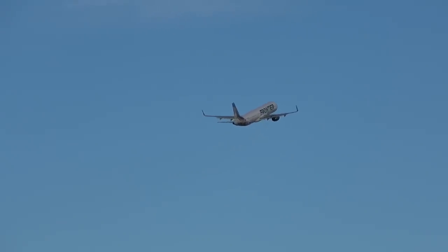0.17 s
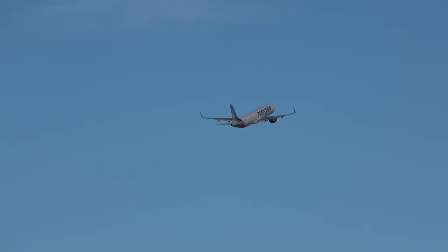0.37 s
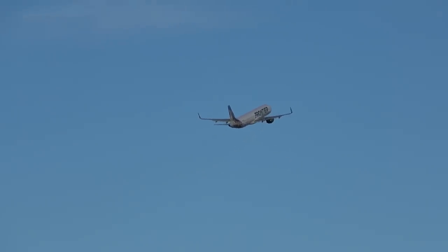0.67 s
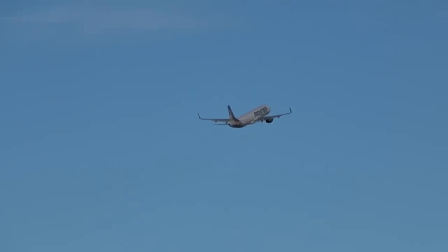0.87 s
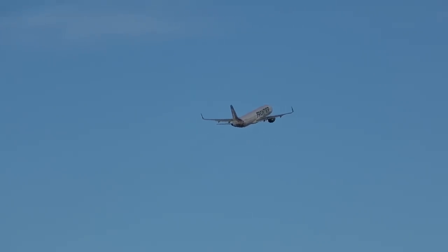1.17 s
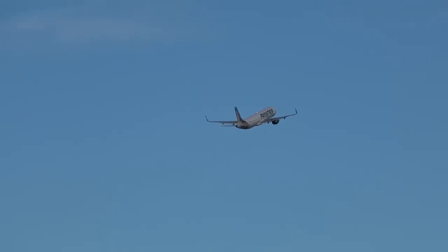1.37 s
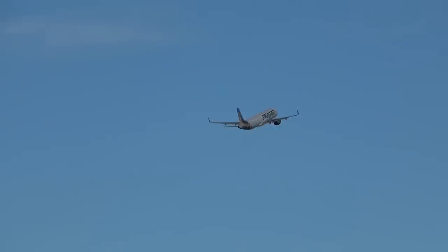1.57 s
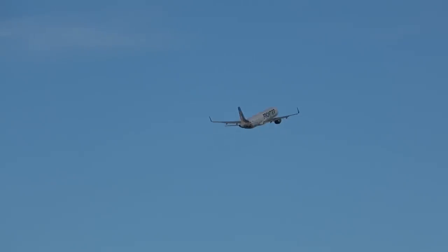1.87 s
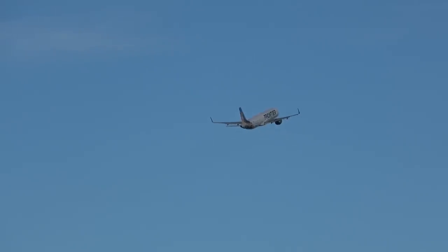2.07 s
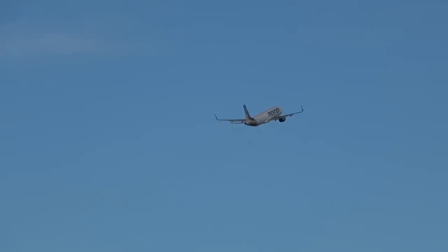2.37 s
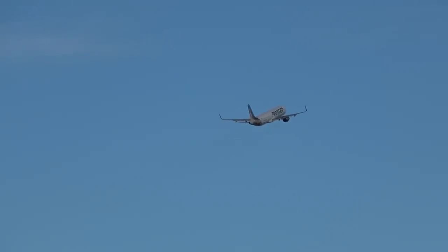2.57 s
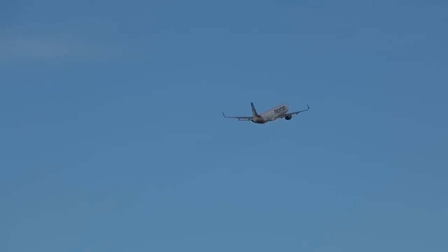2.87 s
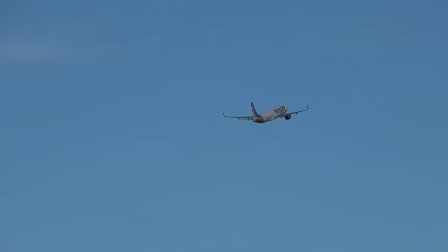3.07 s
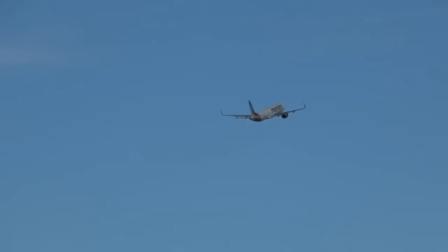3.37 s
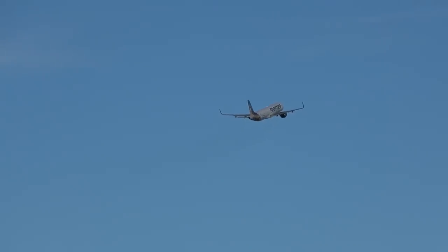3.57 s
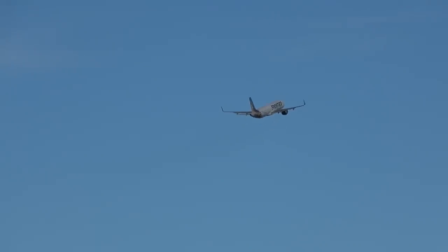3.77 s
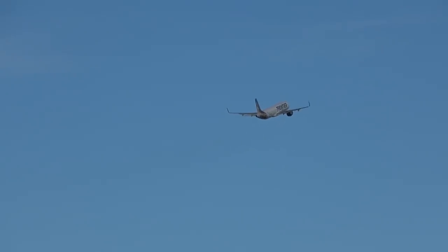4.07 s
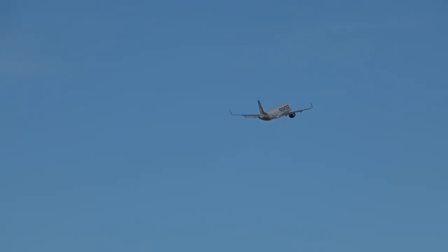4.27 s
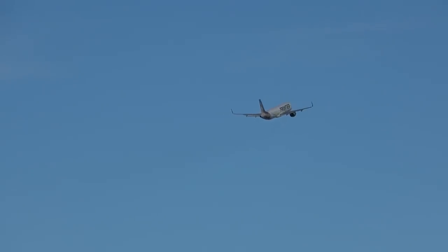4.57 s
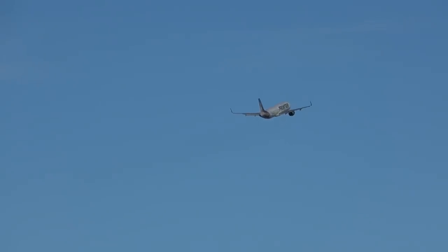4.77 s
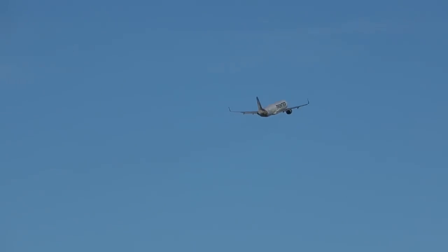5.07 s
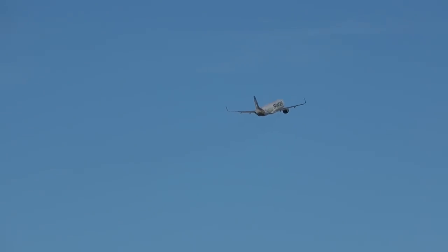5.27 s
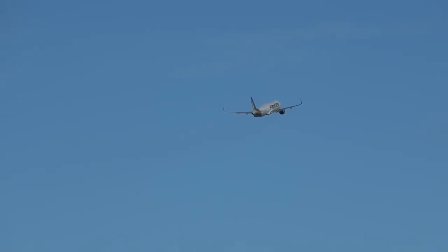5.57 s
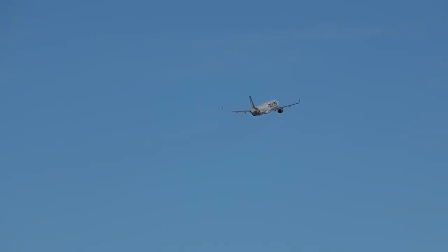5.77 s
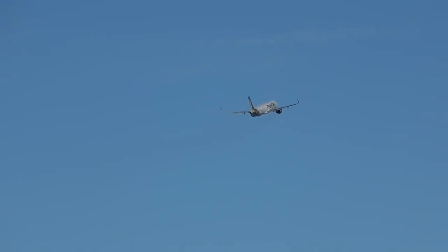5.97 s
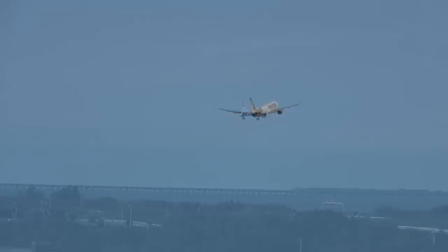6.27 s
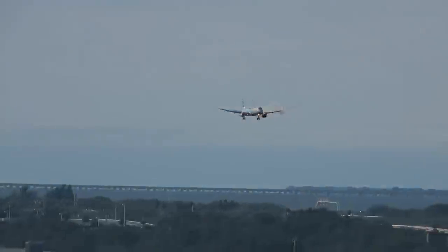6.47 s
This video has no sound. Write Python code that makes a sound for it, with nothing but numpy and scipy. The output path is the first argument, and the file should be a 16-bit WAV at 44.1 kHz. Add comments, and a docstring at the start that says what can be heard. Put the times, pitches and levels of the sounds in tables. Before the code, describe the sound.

Outdoors, one distant microphone hears a jet airliner climbing away: a broad, bass-heavy exhaust rumble and roar, brightest around one and a half seconds, then duller and farther off, with gusty surges. Faint wavering machine tones, a blurred whine and thin hiss lie underneath. Near the end the sound cuts dead with a tiny tick and low bump into a softer, flatter rush of another jet approaching.

```python
"""Airliner climbing away, then one on approach

Far below the climbing jet, exhaust rumble and roar swell and fade: noise bands weighted by eddy size.
Steady turbine tones, likely from machinery on the ground, hum underneath as wavering sines.
A blurred whine and a faint hiss, both filtered noise, join them.
Near the end the sound cuts, with a thin tick and a low bump, to the softer noise rush of an approach."""
import sys
import numpy as np
from scipy import signal
from scipy.io import wavfile

SR = 44100
rng = np.random.default_rng(int(sys.argv[2]) if len(sys.argv) > 2 else 0)


def unload_audio(sound):
    """Save the sound as a 16-bit wav file, at the path given as the first command line argument."""
    columns = np.transpose(np.atleast_2d(sound))
    # keep every value between -1 and 1, then stretch to whole-number steps
    steps = np.round(np.clip(columns, -1, 1) * 32767)
    wavfile.write(sys.argv[1], SR, steps.astype(np.int16))


N = 292381
T = np.arange(N) / SR  # seconds
CUT_S = 6.178
HUM_HZ = 383.7
CUTOFF_HZ = 15800
GUST_DB = 0.36  # spread of the random gusts, separate for each eddy size
BEAM_RISE_S, BEAM_FALL_S = 1.42, 0.5  # a beam arrives slowly and leaves quickly

# ranges of sub-bass, rumble, roar, rush and hiss: low_hz, high_hz
ZONES = [(20, 55), (60, 170), (190, 600), (850, 1450), (2000, 4500)]
# eddy sizes in the exhaust, in the order of ZONES, each with a loud beam that sweeps over the
# listener; a negative fade grows: level_db, fade_db_per_s, beam_s, beam_db
EDDIES = [(-31, -0.06, 1.5, 4.5), (-19.5, 0.23, 1.4, 0.6), (-20.5, 0.05, 1.66, 3.5), (-31.5, 0.79, 1.1, 3),
          (-46, 0.9, 1.26, 5)]
# shape of the exhaust spectrum while near, before the zone levels: pitch_hz, relative_db_per_hz
NEAR_COLOUR = [(18.0, -20), (45.0, -1), (115.0, 1.5), (250.0, -0.5), (420.0, -4.5), (630.0, -12.5),
               (830.0, -13.5), (1050.0, -20.5), (1550.0, -22), (2100.0, -30), (2850.0, -41.5),
               (4100.0, -50), (5300.0, -61), (7400.0, -71)]
# shape of the exhaust spectrum farther off, before the zone levels: pitch_hz, relative_db_per_hz
FAR_COLOUR = [(18.0, -20), (42.0, -9.5), (115.0, -1.5), (180.0, -8.5), (280.0, -2), (660.0, -18.5),
              (840.0, -22), (980.0, -26.5), (1600.0, -33.5), (2200.0, -40), (2850.0, -48), (4200.0, -56.0),
              (5300.0, -66.5), (7400.0, -76)]
# the near colour turns into the far one: start_s, end_s
RECEDE_S = (1.4, 2.5)
# moving air briefly lifts or drops a part of the roar:
# centre_s, half_length_s, centre_hz, half_width_octaves, change_db
SURGES = [(0.05, 0.1, 55, 0.71, -4), (0.286, 0.077, 220, 0.63, 4.5), (0.88, 0.14, 201, 1.5, 2.4),
          (1.08, 0.17, 3300, 1.2, 2.5), (1.619, 0.44, 408, 0.38, 3.6), (1.58, .1, 110, .8, 3),
          (1.9, 0.23, 270, 0.58, 1.2), (2.28, .1, 120, 1.2, 2.5), (2.5, 0.44, 360, 0.38, -2),
          (3.03, 0.077, 300, 3.2, 1), (3.353, 0.27, 199, 0.37, 3.5), (4.099, 0.93, 2590, 1.0, 2.4),
          (5.063, 0.19, 372, 0.91, 3), (5.34, 0.22, 111, .85, 7), (5.66, 0.12, 106, .85, 8),
          (5.945, 0.23, 280, 0.65, 5), (6.03, 0.16, 113.4, 0.54, 8)]
# shape of the approaching jet's spectrum: pitch_hz, relative_db_per_hz
APPROACH_COLOUR = [(20.0, -7), (75.0, -1.5), (220.0, -7), (500.0, -11.5), (1050.0, -17.0), (2000.0, -27),
                   (3000.0, -37.5), (4000.0, -43.5), (5200.0, -53), (7000.0, -56.5), (11000.0, -61),
                   (15500.0, -60.0)]
# loudness of the approaching jet: time_s, level_db
APPROACH = [(6.2, -25), (6.45, -25), (6.63, -23.5)]
# hum partials at rest: multiple of HUM_HZ, level_db
HUM_PARTIALS = [(1, -46), (2, -46.5), (3, -48), (4, -51.5), (5, -57.5), (6, -60), (7, -67.5), (8, -71),
                (9, -74), (10, -80)]
# one hum partial stands out more strongly for a while:
# centre_s, half_length_s, multiple of HUM_HZ, lift_db
HUM_SWELLS = [(0.454, .4, 4, 9.5), (0.9, .5, 3, 7.5), (1.75, .3, 3, 11), (3.9, 0.46, 4, 8),
              (5.002, 0.72, 4, 7.5), (6.152, 0.58, 3, 9)]
# other machinery tones: pitch_hz, level_db
TONES = [(72, -31.5), (525.4, -38), (806.2, -40), (3222, -74.5), (5402, -89.5)]
# course of the faint high hiss, before its overall offset: time_s, relative_db
FAINT_HISS = [(0.0, -66.5), (0.9, -64.5), (1.87, -69), (3.41, -68.5), (5.1, -66), (6.1, -68.5)]


def climbing_jet(flicker_db, shimmer_db, level_db):
    """Mixing noise: each eddy size has its own strength; turbulent air makes bands surge and flicker."""
    far = np.interp(T, RECEDE_S, [0, 1])
    lifts = []  # how far each zone stands above the plain exhaust colour, in dB
    for eddy, zone in zip(EDDIES, ZONES):
        plain_db = (1 - far) * share_db(NEAR_COLOUR, *zone) + far * share_db(FAR_COLOUR, *zone)
        lifts.append(eddy_level(*eddy) - plain_db)
    lifts = np.array(lifts)

    surge_s, length_s, surge_hz, octaves, surge_db = np.transpose(SURGES)
    surges = bell(T - surge_s[:, None], length_s[:, None])
    zone_centres = np.log(ZONES).mean(axis=1)
    shimmer = shimmer_db * drift(11)  # common to all bands
    out = 0
    for hz, noise in noise_bands(top_hz=7400, count=36):
        # each band blends the lifts of its nearest zones
        weights = np.array([np.interp(np.log(hz), zone_centres, row) for row in np.eye(len(ZONES))])
        colour = (1 - far) * at_hz(NEAR_COLOUR, hz) + far * at_hz(FAR_COLOUR, hz)
        surge = (surge_db * bell(np.log2(hz / surge_hz), octaves)) @ surges
        flicker = flicker_db * drift(8.9)
        out = out + noise * from_db(colour + weights @ lifts + surge + shimmer + flicker)
    return from_db(level_db) * out


def eddy_level(level_db, fade_db_per_s, beam_s, beam_db):
    """Level in dB of one eddy size: a steady trend with distance, its passing beam and small gusts."""
    beam = bell(T - beam_s, np.where(T < beam_s, BEAM_RISE_S, BEAM_FALL_S))
    return level_db - fade_db_per_s * T + beam_db * beam + GUST_DB * drift(5.5)


def approaching_jet(flicker_db, brighten_hz, brighten_db_per_s):
    """Engines at low thrust: a softer, flatter rush whose top opens as it comes nearer."""
    opening = brighten_db_per_s * np.maximum(T - CUT_S, 0)
    out = 0
    for hz, noise in noise_bands(top_hz=16400, count=30):
        brighter = opening * bell(np.log2(hz / brighten_hz), 1)
        flicker = flicker_db * drift(9.1)
        out = out + noise * from_db(at_hz(APPROACH_COLOUR, hz) + brighter + flicker)
    return from_db(in_time(APPROACH)[0]) * rms_one(out)


def machine_hum(wander_hz, fade_db, skirt_db):
    """One harmonic series and a few unrelated tones."""
    lines = [(k * HUM_HZ, db + hum_swell(k)) for k, db in HUM_PARTIALS] + list(TONES)
    return sum(tone(hz, db, wander_hz, fade_db, skirt_db) for hz, db in lines)


def hum_swell(multiple):
    """Decibels that the passing swells add to one hum partial."""
    return sum(db * bell(T - s, length_s) for s, length_s, k, db in HUM_SWELLS
               if round(k) == round(multiple))


def tone(hz, level_db, wander_hz, fade_db, skirt_db):
    """A machine tone wavers in pitch and strength, with a noisy skirt around it."""
    phase = 2 * np.pi * np.cumsum(hz + wander_hz * drift(4.86)) / SR
    skirt = from_db(skirt_db) * (drift(31) * np.sin(phase) + drift(22) * np.cos(phase))
    strength = np.sqrt(2) * from_db(level_db + fade_db * drift(4.0))  # sqrt(2): rms to peak
    return strength * (np.sin(phase) + skirt)


def airy_whine(hz, width_hz, level_db, fade_db):
    """A soft, blurred whine: narrow-band noise that sinks into the roar and comes back."""
    whine = rms_one(band(rng.standard_normal(N), hz - width_hz / 2, hz + width_hz / 2))
    return from_db(level_db + fade_db * drift(2.2)) * whine


def faint_hiss(low_hz, offset_db):
    """A nearly flat bed of noise, higher in pitch than the roar."""
    bed = band(rng.standard_normal(N), low_hz, 16500, order=1)
    return from_db(in_time(FAINT_HISS)[0] + offset_db) * rms_one(bed)


def tick(decay_s, level_db):
    """A small sudden step at the cut that relaxes at once."""
    return from_db(level_db) * (T >= CUT_S) * np.exp(-np.maximum(T - CUT_S, 0) / decay_s)


def low_bump(hz, rise_s, level_db):
    """A short boom, a sine that swells and dies just after the cut."""
    age = np.maximum(T - CUT_S, 0)
    swell = (age / rise_s * np.exp(1 - age / rise_s)) ** 2
    return from_db(level_db) * swell * np.sin(2 * np.pi * hz * age)


def noise_bands(top_hz, count):
    """Neighbouring noise bands from 20 Hz, unit power per Hz: rows of centre_hz and noise."""
    # the 100 Hz shift makes the bass bands wider in octaves
    edges = np.geomspace(120, top_hz + 100, count + 1) - 100
    white = rng.standard_normal((2, N + SR))
    rows = []
    for k, (low, high) in enumerate(zip(edges, edges[1:])):
        noise = band(white[k % 2], low, high, order=3)[SR:]  # drop the filter's first second
        rows.append((np.sqrt(low * high), np.sqrt(high - low) * rms_one(noise)))
    return rows


def drift(rate_hz):
    """Smooth chance with a spread near 1: noise through two equal low-pass poles at rate_hz."""
    step = 40  # samples between slow values
    r = np.exp(-2 * np.pi * rate_hz * step / SR)
    chance = rng.standard_normal(N // step + 2002)
    slow = signal.lfilter([1], [1, -2 * r, r * r], chance)[2000:]
    return np.interp(np.arange(N) / step, np.arange(len(slow)), rms_one(slow))


def band(x, low_hz, high_hz, order=2):
    """Butterworth band-pass."""
    sos = signal.butter(order, [low_hz, high_hz], "band", fs=SR, output="sos")
    return signal.sosfilt(sos, x)


def share_db(colour, low_hz, high_hz):
    """Power in dB of a spectrum between two frequencies, summed in 1 Hz steps."""
    gains = from_db(at_hz(colour, np.arange(low_hz, high_hz)))
    return 10 * np.log10(np.sum(gains ** 2))


def at_hz(points, hz):
    """Read a spectrum on a log-frequency axis."""
    known_hz, values = np.transpose(points)
    return np.interp(np.log(hz), np.log(known_hz), values)


def in_time(rows):
    """Each column of a curve table at every sample."""
    s, *columns = np.transpose(rows)
    return [np.interp(T, s, c) for c in columns]


def bell(offset, half_width):
    """A smooth hump of height 1 around zero offset, down to 1/e at half_width."""
    return np.exp(-(offset / half_width) ** 2)


def from_db(db):
    """Decibels to gain."""
    return 10 ** (np.asarray(db) / 20)


def rms_one(x):
    """Scale to unit rms."""
    return x / np.sqrt(np.mean(x ** 2) + 1e-20)


def scene():
    """The climb stops dead at the cut; the approach fades in right after."""
    jet = climbing_jet(flicker_db=0.53, shimmer_db=0.11, level_db=0.0)
    hum = machine_hum(wander_hz=0.78, fade_db=1.26, skirt_db=-15)
    whine = airy_whine(hz=824.4, width_hz=65, level_db=-41.0, fade_db=1.5)
    climb = jet + hum + whine + faint_hiss(low_hz=2500, offset_db=2.5)
    stop = np.clip((CUT_S - T) / 0.001, 0, 1)
    approach = approaching_jet(flicker_db=1.2, brighten_hz=8000, brighten_db_per_s=4.0)
    fade_in = np.clip((T - CUT_S) / 0.021, 0, 1)
    cut = tick(decay_s=0.00043, level_db=-17.5) + low_bump(hz=70.4, rise_s=0.03, level_db=-14.0)
    return (climb * stop + approach * fade_in + cut)[None]


def record(dry):
    """One microphone channel: the ends are eased, peaks stop at full scale and the top is cut."""
    ease = np.sin(np.pi / 2 * np.clip(np.minimum(T, T[-1] - T) / 0.002, 0, 1)) ** 2
    low_pass = signal.ellip(12, 0.1, 90, CUTOFF_HZ, fs=SR, output="sos")
    return signal.sosfilt(low_pass, np.clip(dry * ease, -1, 1))


dry = scene()
out = record(dry)
unload_audio(out)
```